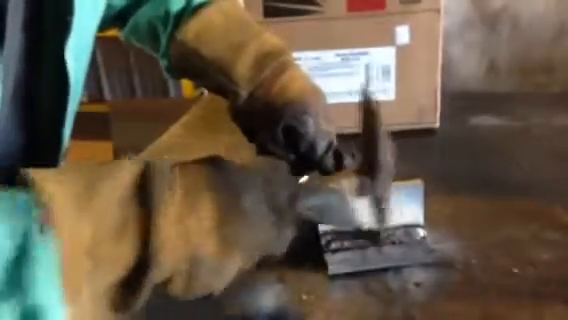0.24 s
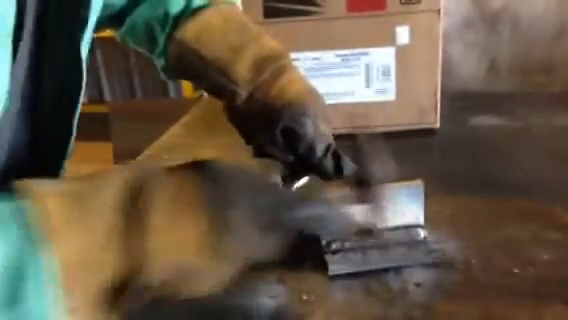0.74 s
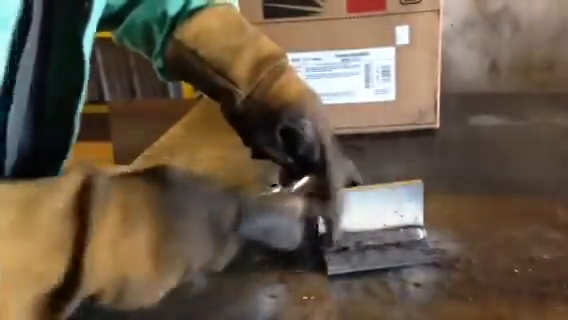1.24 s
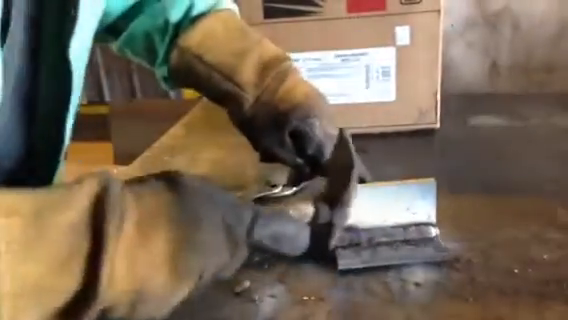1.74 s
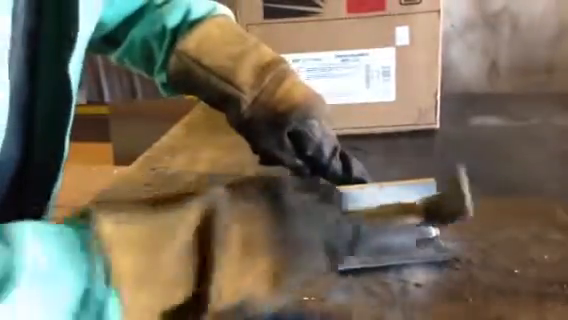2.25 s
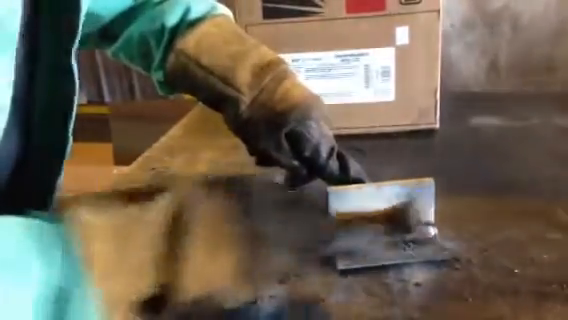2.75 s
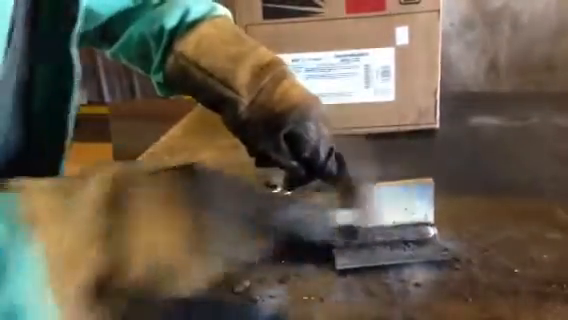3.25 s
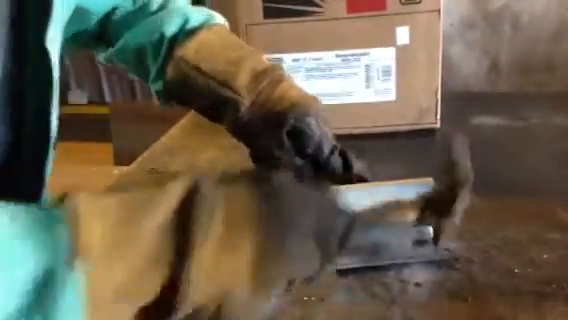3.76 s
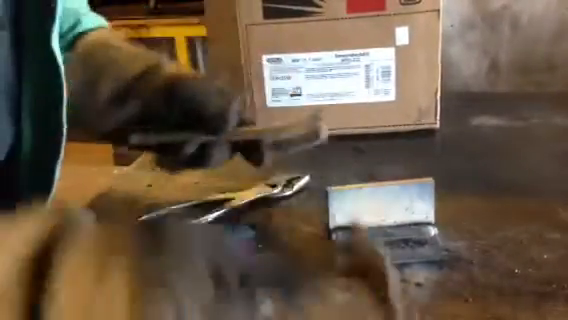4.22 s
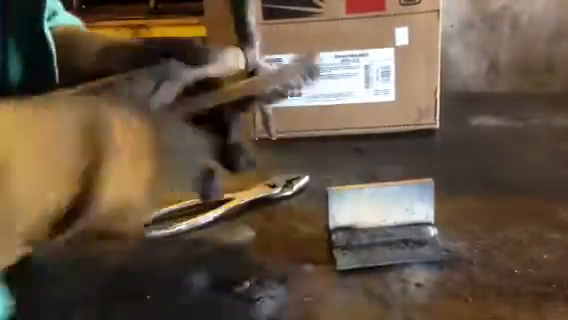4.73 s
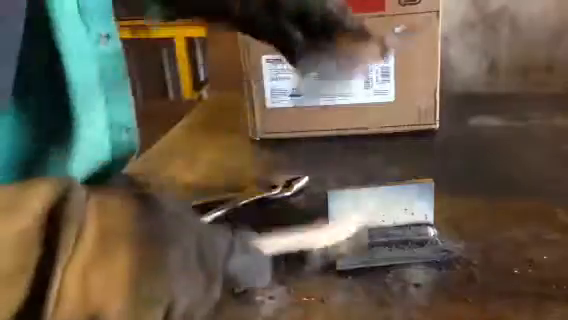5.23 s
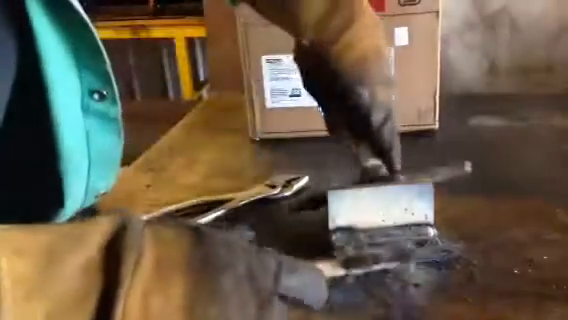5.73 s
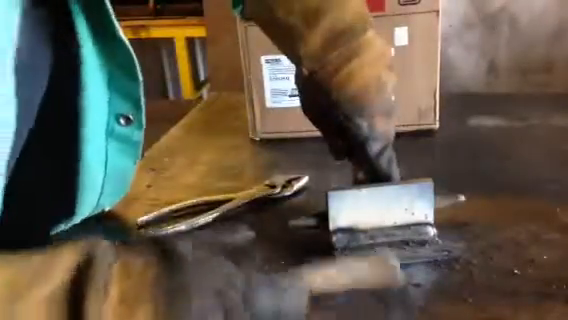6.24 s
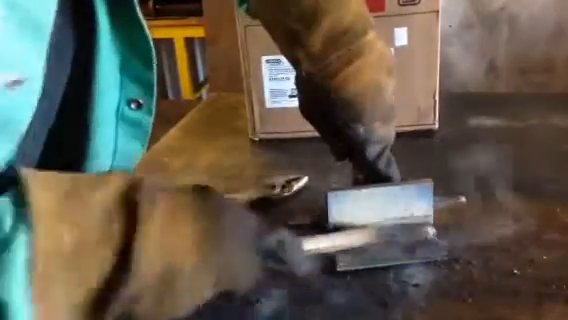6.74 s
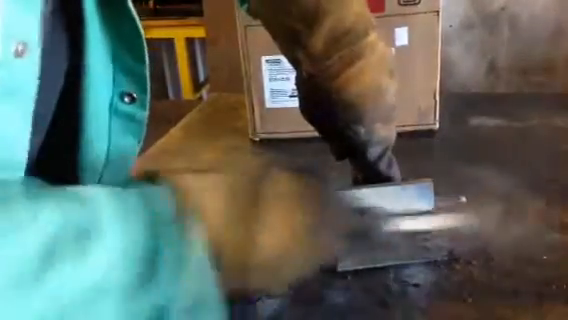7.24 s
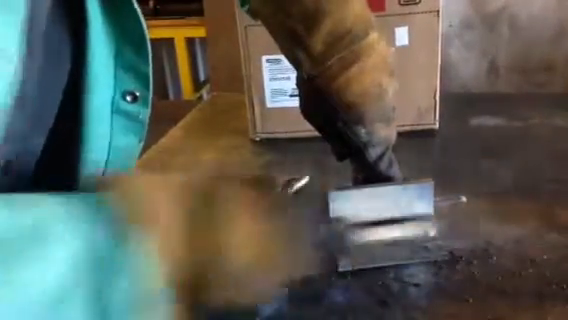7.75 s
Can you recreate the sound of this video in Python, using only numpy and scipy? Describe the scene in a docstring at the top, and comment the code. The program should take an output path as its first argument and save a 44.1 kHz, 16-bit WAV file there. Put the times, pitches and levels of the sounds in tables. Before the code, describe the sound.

Hard metallic chipping blows and gritty scraping on steel, a pause with clanks and a wooden knock, then fast hissing wire-brush strokes.

```python
"""A chipping hammer strikes and rakes along a weld bead on a small steel angle lying on a steel bench in a workshop.
From the start a fan hums, blows set the bench top rattling, and the raking tip chatters into the angle's short modes.
The hammer is laid down with a ring of its head, a wire brush touches faintly and a brush handle knocks.
The hammer is set down again with a short dark clatter and a ping, then the brush strokes the bead in dense clicks.
Steel rings as decaying modes, rattle and air are shaped noise; a room echo and a peak limiter finish it."""
import sys
import numpy as np
from scipy import signal
from scipy.fft import rfft, irfft
from scipy.io import wavfile
from scipy.ndimage import uniform_filter1d, minimum_filter1d

SR = 44100
rng = np.random.default_rng(int(sys.argv[2]) if len(sys.argv) > 2 else 0)


def volts_from_decibels(level):
    """Turn decibel levels (scalar or array-like) into linear amplitude factors."""
    exponent = np.asarray(level, float) / 20
    return 10 ** exponent


def int16_out(signal):
    """Quantize to a 16-bit WAV file."""
    q = np.round(np.clip(np.atleast_2d(signal).T, -1, 1) * 32767)
    wavfile.write(sys.argv[1], SR, q.astype(np.int16))


N = 351918
STEP = 64  # samples between points of a hand movement


def unit(x):
    """Scale to rms 1."""
    return x / np.sqrt(np.mean(x ** 2))


def ring(x, hz, t60):
    """One decaying mode; a unit click starts its envelope at 1."""
    pole = np.exp(2j * np.pi * hz / SR - np.log(1000) / (t60 * SR))
    return signal.lfilter([1], [1, -pole], x).imag


def band(x, hz, octaves, order=2):
    """Band-pass around hz."""
    edges = np.minimum(hz * 2 ** (np.array([-.5, .5]) * octaves), SR / 2.2)
    return signal.sosfilt(signal.butter(order, edges, "band", fs=SR, output="sos"), x)


def coloured(x, points):
    """Shape x by a (Hz, dB) spectrum, at rms 1."""
    hz, db = np.transpose(points)
    f = np.arange(N // 2 + 1) * SR / N + 1
    curve_db = np.interp(np.log(f), np.log(hz), db)
    return unit(irfft(rfft(x) * volts_from_decibels(curve_db), N))


def walk(rate):
    """Smooth random wander of rms 1, with rate new values a second."""
    k = int(SR / rate)
    stairs = np.repeat(rng.standard_normal(N // k + 1), k)
    return unit(uniform_filter1d(uniform_filter1d(stairs, k), k)[:N])


def grains(rate, spread_db):
    """Random clicks, rate a second, some much larger than the rest; rms 1."""
    size = np.minimum(rng.exponential(1, N), 2.5)
    present = rng.random(N) < rate / SR
    return unit(present * rng.standard_normal(N) * volts_from_decibels(spread_db * size))


def clicks(s, gain):
    """One sample per event."""
    x = np.zeros(N)
    x[(np.asarray(s) * SR).astype(int)] = gain
    return x


def swell(s, db, rise_db_s, fall_db_s, hold=0):
    """Gain that climbs to db at s, holds, and falls again; one value a step."""
    t = np.arange(0, N + STEP, STEP) / SR - s
    rise_db = rise_db_s * np.minimum(t, 0)
    fall_db = fall_db_s * np.maximum(t - hold, 0)
    return volts_from_decibels(np.maximum(db + rise_db - fall_db, -150))


def fill(x):
    """From steps to samples."""
    return np.interp(np.arange(N) / STEP, np.arange(len(x)), x)


# Spectrum of the shop air. Each row: frequency in Hz, relative density in dB per Hz.
SHOP_AIR = [(15, -45), (25, -11), (59, -16.5), (92, -4), (130, -11), (293, -16), (405, -17.5), (695, -13),
            (887, -18.5), (1260, -19), (2550, -28), (4800, -30), (7000, -36), (14000, -44.5), (16000, -53)]
# Lines of the fan motor. Each row: frequency in Hz, mean level in dB rms before it wavers.
FAN_LINES = [(34, -68), (94.5, -45), (157, -55), (205, -56.5), (688, -55), (752, -57)]
AIR_DB = -42  # rms, before its slow wander


def shop():
    """Broad air noise and the lines of a fan motor, which waver in level and phase."""
    air = volts_from_decibels(AIR_DB + 1.45 * walk(3.5)) * coloured(rng.standard_normal(N), SHOP_AIR)
    t = np.arange(N) / SR
    hum = 0
    for hz, db in FAN_LINES:
        level = np.sqrt(2) * volts_from_decibels(db + 1.7 * walk(7.9))
        hum = hum + level * np.sin(2 * np.pi * hz * t + 0.45 * walk(3))
    return air + hum


# Strokes of the tip along the bead. Each row: time of most pressure in seconds, chatter level in dB,
# bench rumble level in dB, rise in seconds, fall in seconds.
RAKE_STROKES = [(0.002, -39, -20, 0.022, .2), (0.145, -17, -16.5, 0.015, 0.047),
                (0.2, -28, -21.5, 0.081, 0.089), (0.31, -27.5, -30, .03, 0.13),
                (0.46, -26.5, -31, 0.067, 0.09), (0.572, -26.5, -33, 0.018, 0.093),
                (0.6, -25, -33, 0.04, 0.05), (0.644, -50, -23, 0.031, 0.014),
                (0.692, -27, -30, 0.018, 0.15), (0.749, -26.5, -27, 0.092, 0.04),
                (0.814, -27.5, -20.5, 0.026, 0.13), (1.014, -22.5, -34, 0.052, 0.022),
                (1.091, -37.5, -35, .1, 0.15), (1.159, -54, -29, 0.13, 0.032),
                (1.267, -25, -21.5, 0.064, 0.059), (1.487, -20, -24, 0.0051, 0.018),
                (1.508, -23, -16.5, 0.0079, 0.089), (1.665, -19.5, -41, 0.0049, 0.011),
                (1.74, -47.5, -48, 0.12, 0.036), (2.382, -24.5, -25, 0.018, 0.085),
                (2.578, -36, -30, 0.054, 0.036), (2.684, -40, -31, 0.065, 0.14),
                (2.77, -34, -26.5, 0.008, 0.067), (2.829, -32.5, -20, 0.013, 0.053),
                (2.992, -33, -32.5, 0.12, 0.048), (3.077, -42.5, -28.5, 0.029, 0.21),
                (3.156, -30, -40, 0.028, 0.027), (3.276, -30.5, -28, 0.13, 0.042),
                (3.39, -44, -23, 0.059, 0.043), (3.434, -36, -22.5, 0.078, 0.039),
                (3.522, -36, -30, 0.045, 0.072), (3.577, -33.5, -27, 0.11, 0.022),
                (3.718, -34, -26.5, 0.13, 0.041), (4.146, -48, -42, 0.18, 0.043),
                (4.198, -22.5, -25.5, 0.019, 0.039)]
# How steeply the hammer is held. Each row: time in seconds, level of the angle's top modes in dB.
STEEPNESS = [(0, -1), (.4, -4.5), (.8, 0), (1.1, 3), (1.6, -12), (2.5, -5), (2.8, 0), (3.05, 8), (3.7, 2.5),
             (4.2, 0)]
RAKE_SWELL_DB, RUMBLE_SWELL_DB = 28.5, 15  # lost over one rise or fall time
JAB_DB, JAB_S = -25, 0.014  # a sudden jab lands flatter: top-mode dB, scale of the rise time


def strokes():
    """Pressure of the raking tip: chatter, rumble and top-mode dB; the bench follows more slowly."""
    chatter, rumble_power, top = 0, 0, 0
    for s, db, rumble_db, rise, fall in RAKE_STROKES:
        rise, fall = max(rise, .003), max(fall, .003)
        press = swell(s, db, RAKE_SWELL_DB / rise, RAKE_SWELL_DB / fall)
        steep_db = np.interp(s, *np.transpose(STEEPNESS)) + JAB_DB * np.exp(-rise / JAB_S)
        chatter = chatter + press
        top = top + press * steep_db
        rumble = swell(s, rumble_db, RUMBLE_SWELL_DB / rise, RUMBLE_SWELL_DB / fall)
        rumble_power = rumble_power + rumble ** 2
    return fill(chatter), fill(np.sqrt(rumble_power)), fill(top / chatter)


# Hammer blows and set-downs, also used by bench() and rake(). Each row: start in seconds, level in dB,
# bass in dB, treble in dB, ring length as a factor.
BLOWS = [(0.002, -10, -8, -17, 1.0), (0.141, -2, -2.5, -15.5, 0.91), (0.54, -18.5, -3, -9, 1),
         (0.696, -14.5, -12, -17, 0.47), (0.725, -12, -4, -8, 0.28), (0.8325, -7, -13, -33, 0.48),
         (0.859, -7.5, 0, -27, 0.98), (0.996, -22.5, 7, 6, 1), (1.268, -13.5, 0, -3, 0.47),
         (1.291, -11, -1, -46, 0.59), (1.486, -13.5, -21, -43, 0.84), (1.507, -9, 0, -19, 1),
         (1.561, -12.5, -20, -29, 0.74), (1.666, -11, -9, -8, 0.85), (2.378, -7.5, -65, -4.5, 0.86),
         (2.408, -5.5, -31, -12, 0.84), (2.768, -23, -22, -24, 0.76), (2.803, -15.5, -15, -31, 1.0),
         (2.829, -7, -30, -40, 0.74), (2.857, -12.5, -2, -44, 0.8), (2.919, -16, -29, -39, 0.98),
         (2.96, -18, -6, -24, 0.5), (2.981, -26, -15, 12, 0.27), (3.069, -17, -38, -40, 0.78),
         (3.109, -16, -31, -21, 1.0), (3.341, -16, -34, -40, 1), (3.357, -10, -30, -50, 1.0),
         (3.42, -11, -37, -30, 0.72), (3.458, -10.5, -9, -23, 0.44), (3.527, -16, -16, -37, 0.56),
         (3.633, -18, -15, -49, 1.0), (3.647, -15.5, -28, -40, .6), (3.666, -11.5, -29, -45, 0.98),
         (3.732, -13.5, 0.5, -77, 0.51), (3.987, -17.5, -4, -18, 0.54), (4.013, -23.5, 13.5, -31, 0.73),
         (4.173, -13, 10.5, -18, 0.63), (4.187, -2.5, -54, -16, 0.69), (5.962, -10.5, 5.5, -37, 0.26),
         (5.971, -8, 5, -18, 0.37), (5.99, -4, -12, -25, 0.39)]
# Rattle bands of the bench. Each row: frequency in Hz, level in dB, t60 in seconds at ring length 1,
# share (below 0 follows a blow's bass dB, above 0 its treble dB).
RATTLE_BANDS = [(138, -13.5, 0.32, -0.43), (211, -36, 0.32, -2.5), (296, -8, 0.67, -0.77),
                (457, -5.5, 0.49, -0.69), (670, -5, 0.8, -0.094), (990, -6, 0.63, 0), (1416, -1, 0.41, 0),
                (2147, -4, 0.41, 0), (2980, -4, 0.19, 0.16), (4140, -7, 0.33, 0.46),
                (6500, -8.5, 0.33, 0.85), (9050, -11.5, 0.32, 0.72), (12000, -31, .14, 0.98),
                (14500, -29, .12, 1)]
EDGE_DB, EDGE_PER_DB = 11, 0.92  # a harder blow has more edge around 3 kHz
SET_DOWN_FROM_S, SET_DOWN_DB = 5, -7.5  # set-down sounds from here on have less edge


def blows(rumble):
    """Each blow: a crack, then a gritty rattle with a decay per band; raking keeps the rattle going."""
    s, db, bass_db, treble_db, length = np.transpose(BLOWS)
    edge_db = EDGE_DB + EDGE_PER_DB * db + SET_DOWN_DB * (s > SET_DOWN_FROM_S)
    step = 16  # samples between points of the envelope
    age = np.arange(SR // step) * step / SR
    grit = grains(2500, 5.4)  # slag and loose parts jumping on the plate
    out = 0
    for hz, band_db, t60, share in RATTLE_BANDS:
        power = np.zeros(N // step + len(age) + 1)
        edge = np.exp(-(np.log2(hz / 3200) / 0.97) ** 2)
        tone_db = max(share, 0) * treble_db - min(share, 0) * bass_db
        gains = volts_from_decibels(db + tone_db + edge * edge_db)
        for at, gain, k in zip((s * SR / step).astype(int), gains, length):
            crack = 1.84 * np.exp(-age / 0.0033)
            rattle = 10 ** (-6 * age / (t60 * max(k, .05)))
            power[at:at + len(age)] += gain ** 2 * (crack + rattle)
        struck = np.repeat(power, step)[:N] * volts_from_decibels(2 * (band_db - 12))
        raked = rumble ** 2 * volts_from_decibels(2 * (band_db - 5.5) - 38 * max(share, 0))
        # a band cannot start faster than one cycle
        size = uniform_filter1d(np.sqrt(struck + raked), size=int(SR / hz) + step)
        out = out + size * unit(band(rng.standard_normal(N) + 0.34 * grit, hz, 0.57))
    return out


# Modes of the bench top. Each row: frequency in Hz, relative level in dB, t60 in seconds.
BENCH_MODES = [(260, -9, 0.94), (327.3, -5.5, 0.58), (503, -5, 0.3), (538.3, -4.5, 0.19),
               (604.6, -14.5, 0.35), (717.5, -13.5, 0.4), (755.7, 5.5, 0.22), (1017, -3.5, 0.34),
               (1265, -12, 0.8), (1459, 4, 0.082), (1755, -12, 0.28), (1911, 7, 0.067), (2122, -6.5, 0.47),
               (2320, -15, 0.11)]
# The work shifts along the bench, from where its lowest mode moves to where the second does.
# Each row: time in seconds, shift in dB (taken from the lowest mode, given to the second).
WORK_SHIFT = [(0, -5.5), (.7, 3.5), (1.0, 6.5), (1.7, -2.5), (2.35, 3.5), (3.0, 9.5), (3.8, 7.5), (4.3, 6),
              (6, 2)]


def bench(rumble):
    """Blows and drag ring the plate modes; the push lasts a fraction of a millisecond."""
    s, db, bass_db, _, length = np.transpose(BLOWS)
    spot = rng.standard_normal((len(s), len(BENCH_MODES))).T  # each blow lands elsewhere on the mode shapes
    drag = rumble * grains(900, 5.0) * volts_from_decibels(-34.5)
    shift_db = np.interp(np.arange(N) / SR, *np.transpose(WORK_SHIFT))
    out = 0
    for k, ((hz, mode_db, t60), share) in enumerate(zip(BENCH_MODES, spot)):
        low = np.clip((900 - hz) / 600, 0, 1)
        gain = np.tanh(share) * np.clip(length, 0, 1) * volts_from_decibels(db + low * bass_db - 14.5)
        push = clicks(s, gain) + drag * volts_from_decibels(2. * walk(5.22))
        direction = (k == 1) - (k == 0)
        out = out + volts_from_decibels(mode_db) * ring(push * volts_from_decibels(shift_db * direction), hz, t60)
    return uniform_filter1d(uniform_filter1d(out, size=7), size=9)


# Modes of the steel angle. Each row: frequency in Hz, width in Hz, relative level in dB.
ANGLE_MODES = [(3910, 65, -14.5), (4320, 380, -6), (6725, 103, -3.5), (7300, 95, -6), (8100, 140, -12),
               (10450, 35, -15.5), (10730, 120, -9.5), (12300, 270, -14), (12800, 160, -6),
               (13700, 200, -26), (14900, 42, -8.5)]


def rake(chatter, steep_db):
    """The tip skips over the ripples of the bead: dense ticks that ring the angle, with grit between."""
    s, db, _, treble_db, _ = np.transpose(BLOWS)
    hits = clicks(s, volts_from_decibels(db + treble_db + 16.0))
    ticks = grains(1400, 14.0)
    out = volts_from_decibels(-14) * band(chatter * ticks + hits, 6300, 0.41)
    for hz, width, mode_db in ANGLE_MODES:
        # each mode feels the skips in its own way; a steeper tip favours the high ones
        high = np.clip((hz - 8000) / 4500, 0, 1)
        feel = chatter * volts_from_decibels(high * steep_db + 3.3 * walk(40))
        push = feel * (0.8 * ticks + grains(2500, 8.1)) + hits
        t60 = 2.53 / max(width, 15)  # narrow modes ring longer
        out = out + volts_from_decibels(mode_db - 40.5) * np.sqrt(width) * ring(push, hz, t60)
    return out


# Echo bands of the shop. Each row: frequency in Hz, relative level in dB, t60 in seconds.
ROOM_BANDS = [(227, -27.5, 0.91), (477, -20, 0.84), (1196, -24.5, 1.32), (2900, -25.5, 0.95),
              (6130, -23, 0.28), (11000, -34, 0.5)]


def room(x):
    """Diffuse echo of the shop: noise bands that build up over some ms, each with its own decay."""
    t = np.arange(SR) / SR
    tail = 0
    for hz, db, t60 in ROOM_BANDS:
        tail = tail + volts_from_decibels(db - 60 * t / t60) * band(rng.standard_normal(SR), hz, 1.37)
    return signal.fftconvolve(x, tail * (1 - np.exp(-t / 0.0026)) * volts_from_decibels(-22))[:N]


# Modes of the hammer head, with a long faint line at 3869 Hz for its ring lingering in the room.
# Each row: frequency in Hz, relative level in dB, t60 in seconds when free,
# spot where the mode moves most (0-1).
HEAD_MODES = [(3864, 0, .25, 0), (3869, -27, 1.3, 0), (4450, 2, .03, 1), (3750, 0, .03, 1),
              (2400, 0, .03, 1), (4936, -8, .06, .2), (6100, -10, .07, .2), (7741, -8, .2, 1),
              (12900, -22, .06, 0), (14570, -25, .1, .8)]
# Touches of the head on steel. Each row: start in seconds, level in dB, struck spot (0-1),
# freedom to ring (0-1).
HEAD_TOUCHES = [(3.987, -34, .6, .3), (4.105, -38, 0., .3), (4.160, -36, 0., .5), (5.972, -16, .95, 1.),
                (0.6, -30, 0., .2), (2.829, -22, 0., .1), (4.127, -19, 0., .15), (4.189, -10, 0., 1.)]


def head():
    """The head rings as long as the glove lets it; a touch wakes most the modes that move at that spot."""
    out, t = np.zeros(N), np.arange(SR) / SR
    onset = 1 - np.exp(-t / .0008)
    for s, db, spot, free in HEAD_TOUCHES:
        for hz, mode_db, t60, at in HEAD_MODES:
            start_db = db + mode_db - 30 * abs(spot - at)
            fade = volts_from_decibels(start_db - 60 * t / (t60 * max(free, .05)))
            out[int(s * SR):][:len(t)] += fade * onset * np.sin(2 * np.pi * hz * t)
    return out


# Wire brush strokes. Each row: start of full pressure in seconds, its length in seconds, level in dB,
# body under 7 kHz in dB, way (above 0 push, below 0 pull; size scales the glide).
BRUSH_STROKES = [(4.636, 0.017, -56, 17, 1), (4.858, .012, -54, 5, 1), (5.07, 0.036, -55.5, 6, 1),
                 (6.532, .13, -42.5, -2, 0.79), (6.745, 0.073, -43.5, -1, -0.89), (6.899, 0.07, -35, -3, 1),
                 (7.06, 0.062, -40, -3.5, -1), (7.225, 0.062, -37, -3, 1), (7.37, 0.067, -41, -3, -3),
                 (7.524, 0.058, -36, -3.5, 1), (7.665, 0.067, -40, -3, -1), (7.825, 0.075, -37, -2, 1),
                 (7.978, .05, -44.5, 3, -1)]
# Spectrum of the bristles. Each row: frequency in Hz, relative density in dB per Hz.
BRISTLE_HISS = [(880, -34), (1500, -4.5), (3730, -6.5), (5020, -7), (5880, -8.5), (10000, -5), (13500, -6),
                (15500, -8), (16000, -33)]
BRUSH_RISE_DB_S, BRUSH_FALL_DB_S = 346, 498  # dB per second
BRIGHT_HZ = 10640  # bright spot in the middle of a stroke
BRIGHT_HZ_PER_S = 32000  # glide at way 1: it climbs on a push and sinks on a pull


def brush():
    """Hundreds of wires flick over the bead; the bright spot moves with the stroke, the angle sings faintly."""
    t = np.arange(0, N + STEP, STEP) / SR
    total, glide, body_db = 0, 0, 0
    for s, hold, db, low_db, way in BRUSH_STROKES:
        press = swell(s, db, BRUSH_RISE_DB_S, BRUSH_FALL_DB_S, hold)
        total = total + press
        glide = glide + press * way * BRIGHT_HZ_PER_S * np.clip(t - s - hold / 2, -.1, .1)
        body_db = body_db + press * low_db
    bright_hz = BRIGHT_HZ + glide / total
    body = fill(volts_from_decibels(body_db / total))
    wires = grains(9000, 1.)
    hiss = coloured(wires, BRISTLE_HISS)
    low = signal.sosfiltfilt(signal.butter(2, 7000, fs=SR, output="sos"), hiss)
    spots = 0
    for hz in range(8000, 15000, 1000):
        near = fill(np.exp(-((bright_hz - hz) / 1300) ** 2))
        spots = spots + near * unit(band(wires, hz, 0.18))
    song = unit(ring(wires, 10450, .1)) * volts_from_decibels(-21)  # a mode of the angle
    rasp = unit(band(wires, 5000, 0.25)) * volts_from_decibels(-18 + 3.3 * walk(8))
    sound = hiss - low + volts_from_decibels(-12.5) * spots + song + body * (low + rasp)
    return fill(total) * volts_from_decibels(1.5 * walk(40)) * sound


# Ticks of the handle knock. Each row: start in seconds, click level in dB.
KNOCK_TICKS = [(5.334, -20), (5.3360, -10), (5.3392, -7)]
# Hollow modes of the knock. Each row: frequency in Hz, relative level in dB, t60 in seconds.
KNOCK_MODES = [(139, -8.5, 0.089), (197, -13.5, 0.074), (380, -31, 0.064), (790, -20, 0.015)]


def knock():
    """A wooden handle hits: quick noise ticks with a brief echo and a short hollow thump of modes."""
    s, db = np.transpose(KNOCK_TICKS)
    first = clicks(s[:1], 0.89)
    thump = sum(volts_from_decibels(mode_db) * ring(first, hz, t60) for hz, mode_db, t60 in KNOCK_MODES)
    touch = clicks(s, volts_from_decibels(db))
    tick = signal.lfilter([1], [1, -.96], touch)
    echo = volts_from_decibels(-25.0) * signal.lfilter([1], [1, -np.exp(-1 / (0.014 * SR))], touch)  # fades over 14 ms
    return thump + band((tick + echo) * rng.standard_normal(N), 4600, 2.1)


def scene():
    """All sources and their echo; the work is filtered below 55 Hz and above 13.6 kHz."""
    chatter, rumble, steep_db = strokes()
    work = blows(rumble) + bench(rumble) + rake(chatter, steep_db)
    work = signal.sosfilt(signal.butter(6, 13600, fs=SR, output="sos"), work) + knock()
    work = signal.sosfilt(signal.butter(2, 55, "high", fs=SR, output="sos"), work) + brush()
    ping = head()
    return (work + ping + room(work + volts_from_decibels(-7) * ping) + shop())[None]


def band_limit(x):
    """A steep low-pass at the top of the band."""
    return signal.sosfilt(signal.butter(12, 16500, fs=SR, output="sos"), x)


def record(dry):
    """A low-pass removes the very top and a limiter holds peaks under a ceiling."""
    ceiling = 0.69  # of full scale
    dry = signal.sosfilt(signal.butter(8, 15400, fs=SR, output="sos"), dry)
    gain = minimum_filter1d(ceiling / np.maximum(np.abs(dry), ceiling), size=600, axis=1)
    mix = dry * uniform_filter1d(gain, size=300, axis=1)
    return band_limit(mix)


dry = scene()
out = record(dry)
int16_out(out)
```